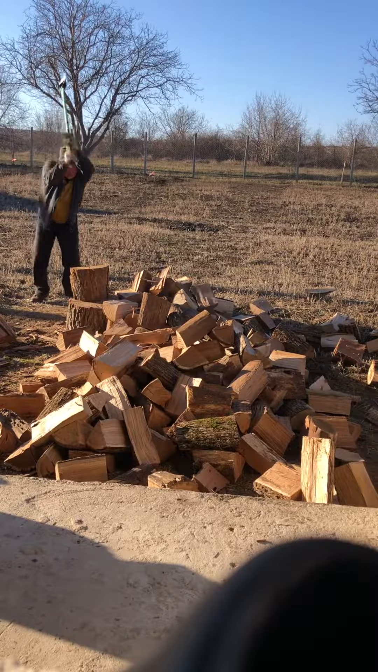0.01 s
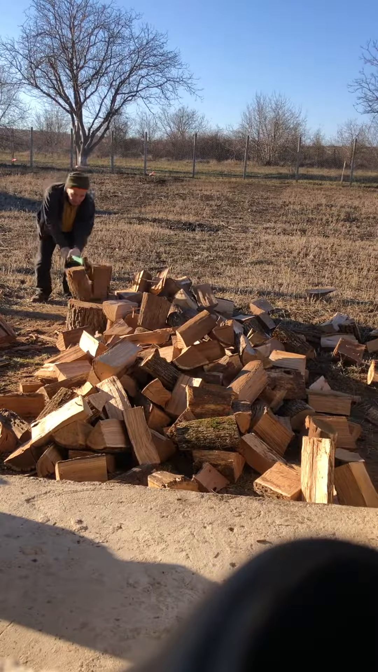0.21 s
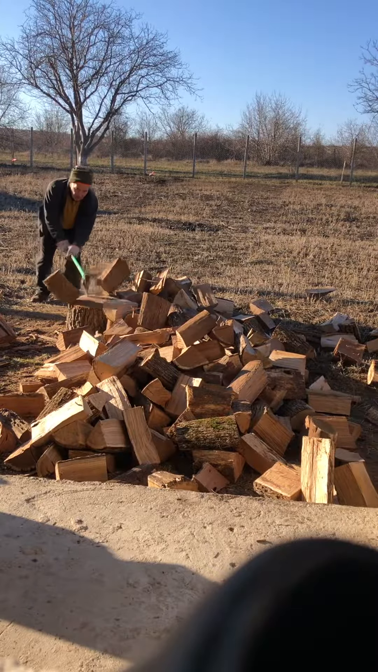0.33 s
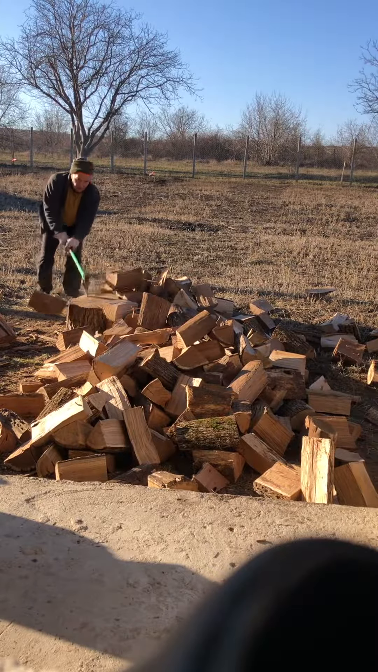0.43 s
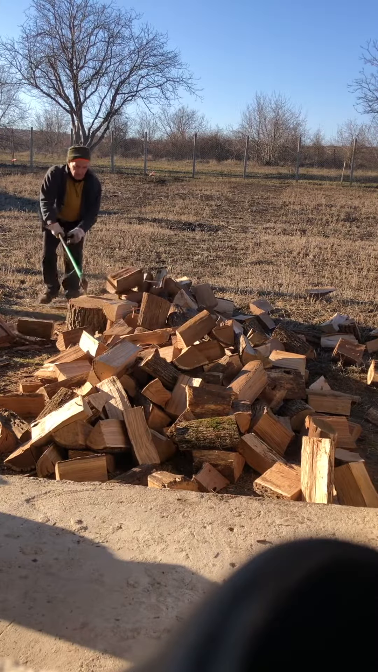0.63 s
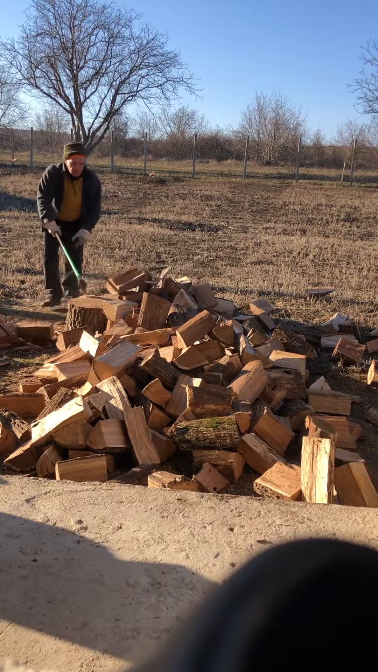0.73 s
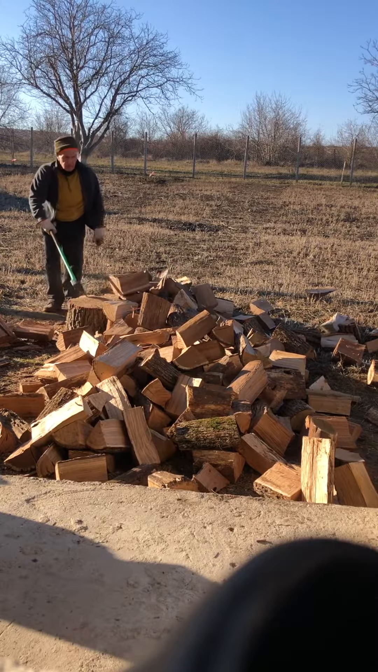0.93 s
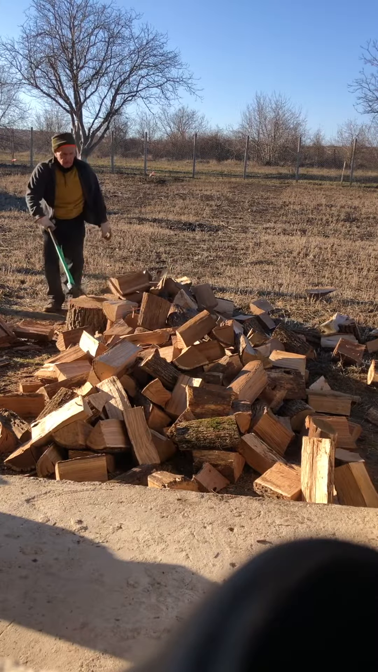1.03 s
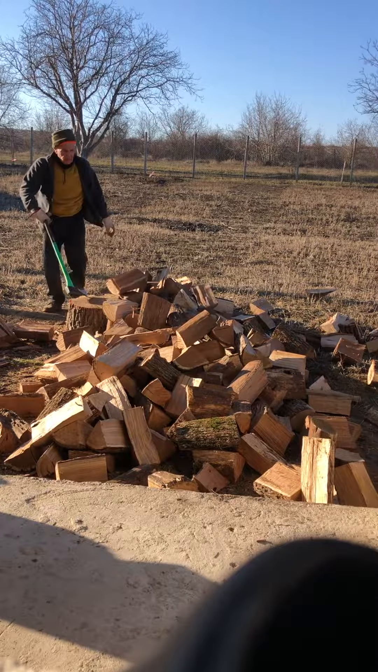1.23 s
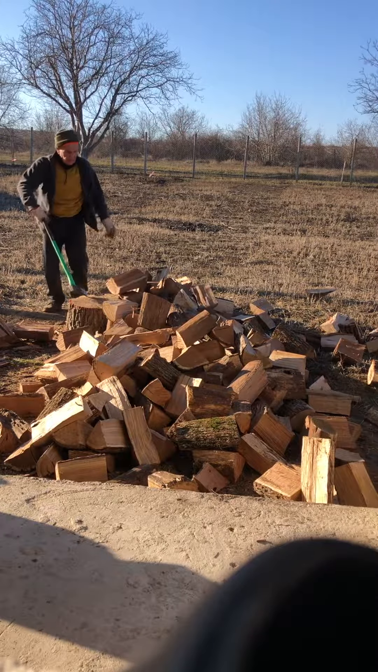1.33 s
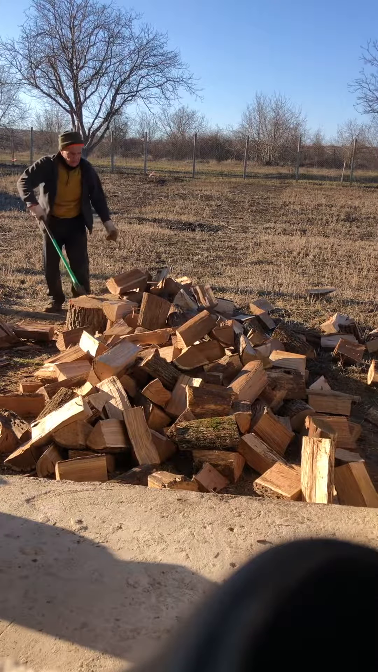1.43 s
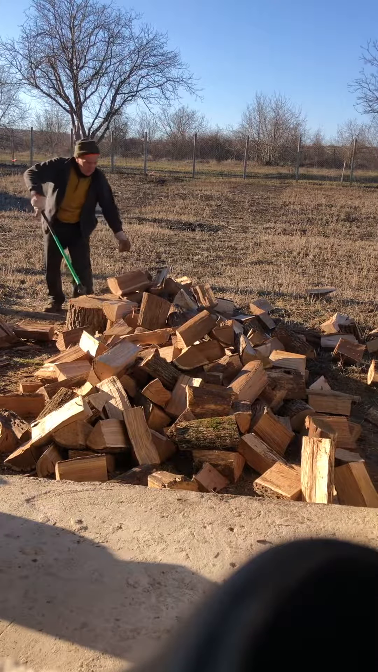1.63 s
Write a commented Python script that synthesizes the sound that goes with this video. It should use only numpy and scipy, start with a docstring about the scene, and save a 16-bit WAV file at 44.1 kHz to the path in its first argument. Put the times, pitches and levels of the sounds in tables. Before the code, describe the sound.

Wood splitting outdoors: a faint metallic tick, a sudden loud axe crack with ripping fibres and block thump, then snaps and wooden knocks fading quickly into soft air, light breeze and tiny chirps, with short scattered yard echoes.

```python
"""Axe splitting a log

An axe splits a log on a chopping block in a field, some metres from a yard: noise crack, ringing
log modes, grainy tearing and low sine thuds. The halves knock on the woodpile as click-driven modes;
splinters and bark are grainy bursts, a metal part ticks. Sparrows chirp as bending sines over
filtered-noise air, hum and breeze. Noise tails that die band by band give the echoes."""
import sys
import numpy as np
from scipy import signal
from scipy.io import wavfile

SR = 44100
rng = np.random.default_rng(int(sys.argv[2]) if len(sys.argv) > 2 else 0)


def transcribe(u):
    """Save the signal u as a 16-bit wav file named by the first command-line argument.

    u: samples, shape (n,) or (channels, n), limited to [-1, 1]; the rate is SR.
    q: integer samples, one column per channel.
    """
    v = np.clip(np.atleast_2d(u).T, -1, 1)
    q = np.round(v * 32767).astype(np.int16)
    wavfile.write(sys.argv[1], SR, q)


N = 74970

BLOW_S = .2236
# ring modes of the log: f/Hz, level when torn/dB, t60/s, level when struck/dB
LOG_MODES = [(333, -4.5, 0.022, -14), (472, 0, 0.029, -5), (575, 1, 0.036, -3.5), (740, -1, 0.026, -1.5),
             (889, -0.5, .035, 4), (1176, -2.5, 0.024, -3), (1410, 0, 0.012, -9), (1724, -1, 0.024, 0.5),
             (2000, -9.5, .012, -14), (3068, -14, 0.016, -4.5)]


def amp(db):
    """Amplitude ratio of a level in dB."""
    return 10 ** (np.asarray(db) / 20)


def unit(x):
    """Scale to RMS 1."""
    return x / np.sqrt(np.mean(x ** 2) + 1e-20)


def curve(rows):
    """Straight lines through (t/s, value) rows, per sample."""
    return np.interp(np.arange(N) / SR, *np.transpose(rows))


def at_hz(rows, hz, axis=1):
    """Table column at a frequency, interpolated over log frequency."""
    rows = np.array(rows)
    return np.interp(np.log(hz), np.log(rows[:, 0]), rows[:, axis])


def impulse(s):
    """Single unit click at s."""
    return np.arange(N) == int(s * SR)


def band(x, low_hz, high_hz):
    """Butterworth band-pass."""
    edges_hz = [low_hz, min(high_hz, .45 * SR)]
    return signal.sosfilt(signal.butter(2, edges_hz, "band", fs=SR, output="sos"), x + 1e-18)


def bands():
    """Half-octave bands from 40 Hz: low, high and centre in Hz."""
    edges_hz = 40 * 2 ** np.arange(0, 9.1, .5)
    return [(low, high, np.sqrt(low * high)) for low, high in zip(edges_hz, edges_hz[1:])]


def coloured(x, spectrum):
    """Half-octave bands at table gains, falling 24 dB/octave below the first row."""
    out = 0
    for k, (low_hz, high_hz, hz) in enumerate(bands()):
        octaves_below = max(0, np.log2(spectrum[0][0] / hz))
        gain = amp(at_hz(spectrum, hz) - 24 * octaves_below)
        out = out + (-1) ** k * gain * band(x, low_hz, high_hz)
    return out


def drift(rate_hz):
    """Slow random signal of RMS 1: noise through two equal low-pass poles."""
    r = np.exp(-2 * np.pi * rate_hz / SR)
    noise = rng.standard_normal(N + SR)
    return unit(signal.lfilter([1], [1, -2 * r, r * r], noise)[SR:])  # settled part


def dying(s, t60_s, rise_s=0.00044):
    """Envelope from s on: exponential rise (time constant rise_s) and decay."""
    t = np.maximum(np.arange(N) / SR - s, 0)
    return (1 - np.exp(-t / max(rise_s, 1e-5))) * amp(-60 * t / t60_s)


def ring(x, modes):
    """Two-pole resonators driven by x, one dying sine per mode, alternating in sign."""
    out = 0
    for k, (hz, db, t60_s) in enumerate(modes):
        r = amp(-60 / (t60_s * SR))
        w = 2 * np.pi * hz / SR
        mode = signal.lfilter([0, np.sin(w)], [1, -2 * r * np.cos(w), r * r], x + 1e-18)
        out = out + (-1) ** k * amp(db) * mode
    return out


def grains(per_s, uneven_db):
    """Random clicks of uneven size and either sign, RMS 1."""
    size = amp(uneven_db * np.minimum(rng.exponential(1, N), 4)) * rng.choice([-1, 1], N)
    return unit(size * (rng.random(N) < per_s / SR))


def burst(noise, envelope):
    """Noise under an envelope, scaled to the envelope's energy."""
    x = noise * envelope
    return x * np.sqrt(np.sum(envelope ** 2) / (np.sum(x ** 2) + 1e-30))


def air():
    """Filtered noise and faint ringing tones that swell together."""
    # air and far hum: f/Hz, level/dB per Hz
    air_spectrum = [(130, -3), (300, -8), (600, -4.5), (1100, -7.5), (1600, -14), (2500, -20), (5000, -23),
                    (10000, -30.5), (16000, -33)]
    # faint tones in the hum: f/Hz, level/dB, t60/s
    hum_tones = [(725.6, -2.5, 0.27), (1060, 6.5, .03)]
    # swell of air and hum: t/s, level/dB
    hum_swell = [(0, -4.5), (.6, 9.5), (.9, 0), (1.4, -2.5)]
    hiss = amp(-62.5) * unit(coloured(rng.standard_normal(N), air_spectrum))
    tones = amp(-71.5) * unit(ring(rng.standard_normal(N), hum_tones))
    return amp(curve(hum_swell)) * (hiss + tones)


def breeze():
    """Low noise band with a lumpy level."""
    # breeze before the lumps: t/s, level/dB
    wind = [(0, -54), (.13, -68.5), (.2, -55), (.5, -48), (.8, -57), (1.0, -81), (1.08, -65), (1.19, -64),
            (1.3, -53.5), (1.37, -66.5), (1.43, -56), (1.49, -58), (1.55, -65), (1.68, -59)]
    lumps_db = -2.5 * drift(21)
    return amp(curve(wind) + lumps_db) * unit(band(rng.standard_normal(N), 36.9, 110))


def sparrows():
    """Fluttering sines that rise, fall or bend; a parabola takes pitch through first, middle and last."""
    # notes: t/s, length/s, first f/Hz, middle f/Hz, last f/Hz, level/dB
    notes = [(.042, .018, 3700, 4500, 5200, -73), (.058, .036, 5200, 4800, 3500, -72),
             (.85, .03, 2450, 2900, 3500, -71), (.115, .04, 3000, 3500, 4100, -69),
             (.153, .037, 4000, 3100, 2600, -69), (.882, .016, 3400, 3000, 2750, -66),
             (.893, .03, 4700, 4300, 4200, -75), (.965, .03, 2700, 3100, 3600, -72),
             (1.02, .04, 2900, 3700, 3700, -74), (1.088, .034, 3000, 4100, 4700, -68),
             (1.116, .036, 4500, 3300, 3050, -68), (1.125, .045, 4300, 4500, 3900, -69),
             (1.16, .045, 2800, 3900, 2800, -68), (1.195, .055, 4200, 4200, 3300, -71),
             (1.27, .065, 3400, 4200, 3200, -73), (1.655, .03, 4500, 4600, 5300, -71),
             (1.675, .03, 2800, 4300, 4800, -68)]
    wobble_hz = 90 * np.resize(drift(180), N + SR)
    flutter_db = 2.5 * drift(69.66)
    out = np.zeros(N + SR)
    for s, length_s, first_hz, mid_hz, last_hz, db in notes:
        u = np.linspace(0, 1, int(length_s * SR))
        span = slice(int(s * SR), int(s * SR) + len(u))
        hz = first_hz * (1 - u) * (1 - 2 * u) + mid_hz * 4 * u * (1 - u) + last_hz * u * (2 * u - 1)
        envelope = np.sqrt(np.sin(np.pi * u).clip(0))
        turns = np.cumsum(hz + wobble_hz[span]) / SR
        out[span] += amp(db) * envelope * np.sin(2 * np.pi * turns)
    return out[:N] * amp(flutter_db)


def ticks():
    """A small metal part ticks on the swing: clicks into metal modes."""
    # ticks: t/s, level/dB
    tick_rows = [(0.143, -52.5)]
    # metal ring: f/Hz, level/dB, t60/s
    metal_modes = [(11000, 0, .05), (5600, -14, .03)]
    clicks = np.zeros(N)
    for s, db in tick_rows:
        clicks[int(s * SR)] = amp(db)
    return ring(clicks, metal_modes)


def snaps():
    """Splinters snap and bark scuffs: broad grainy bursts around a centre."""
    # snaps: t/s, level/dB, t60/s, centre f/Hz
    snap_rows = [(0.233, -30, 0.011, 9000), (0.2535, -21.5, 0.015, 9000), (0.2782, -20.5, 0.017, 6000),
                 (0.403, -52, 0.012, 9000), (0.429, -21, 0.015, 1890), (0.4311, -33, 0.0098, 6700),
                 (0.4575, -37, 0.017, 5500), (0.517, -55.5, 0.25, 9000), (0.552, -33, 0.084, 3430),
                 (.631, -61, 0.018, 5940), (.653, -44, 0.006, 3800), (0.698, -51, 0.066, 5400),
                 (0.712, -57, 0.033, 7600), (0.7638, -43, 0.037, 2310), (0.812, -53.5, 0.1, 3630),
                 (0.895, -54, 0.015, 4250), (0.936, -53, 0.0085, 3570), (1.529, -59.5, 0.12, 2970)]
    spread = 2.3  # band edge to centre ratio
    noise = grains(10000, 2.7)
    out = 0
    for s, db, t60_s, hz in snap_rows:
        envelope = dying(s, t60_s, rise_s=.06 * t60_s)
        out = out + amp(db) * burst(band(noise, hz / spread, hz * spread), envelope)
    return out


def knocks():
    """Halves and a chip knock on the pile: click and rattle ring modes, favouring those near one pitch."""
    # knocks: t/s, level/dB, pitch ratio to a half, favoured f/Hz
    knock_rows = [(.5555, -26.5, 1.09, 2200), (.558, -21.5, 1.007, 530), (.5665, -25, 1.01, 530),
                  (.577, -30.5, 1.04, 610), (.61, -40.5, 1.05, 750), (.7645, -38, 1, 860),
                  (.773, -47.5, 1.03, 600), (.794, -46, 0.93, 800), (1.546, -59, 2.83, 1910)]
    # ring of a loose half: f/Hz, level/dB, t60/s
    half_modes = [(366, -9, .05), (565, 0, .07), (743, -9, .04), (1050, -4, .03), (1560, -10, .025),
                  (2040, -8, .02), (2800, -10, .015)]
    rattle_t60_s, favour_db = 0.0089, 8  # mode loss = favour_db * octaves from favoured pitch squared
    rattle = amp(-22) * grains(3100, 0.86)
    out = 0
    for s, db, pitch, favoured_hz in knock_rows:
        modes = []
        for hz, mode_db, t60_s in half_modes:
            octaves = np.log2(hz * pitch / favoured_hz)
            modes.append((hz * pitch, mode_db - favour_db * octaves ** 2, t60_s))
        contact = impulse(s) + rattle * dying(s, rattle_t60_s)
        out = out + ring(amp(db) * contact, modes)
    return out


def thuds():
    """Block, ground and boots: sines that swell, glide in pitch and die."""
    # thuds: t/s, level/dB, first f/Hz, last f/Hz, t60/s
    thud_rows = [(0.223, -20.5, 234, 122.8, 0.32), (.236, -18.5, 110, 59.5, 0.13),
                 (0.274, -25, 150, 152, 0.068), (0.306, -22.5, 204.5, 59.5, 0.18),
                 (0.456, -35.5, 250, 228, 0.086), (0.488, -30.5, 155, 142, 0.061),
                 (0.559, -31, 312, 127, 0.11), (.574, -26, 110, 74, 0.11), (.635, -27.5, 253, 236, 0.049),
                 (0.699, -44, 80, 55.4, 0.43), (0.794, -52, 281, 282, 0.074),
                 (0.883, -47.5, 158, 142.5, 0.15), (1.087, -46.5, 263, 71.7, 0.16)]
    glide_s = .015  # time constant
    out = 0
    for s, db, first_hz, last_hz, t60_s in thud_rows:
        t = np.maximum(np.arange(N) / SR - s, 0)
        turns = last_hz * t - (first_hz - last_hz) * glide_s * np.expm1(-t / glide_s)
        envelope = dying(s, t60_s, rise_s=.5 / first_hz)  # half a cycle
        out = out + amp(db) * envelope * np.sin(2 * np.pi * turns)
    return out


def tearing():
    """Fibres tear as the log opens: grains into the log's ring, plus their hiss."""
    # opening: t/s, level/dB
    tear = [(.225, -27.5), (.235, -18.5), (.243, -15), (.254, -22), (.275, -23.5), (.29, -24.5),
            (.305, -22.5), (.32, -35), (.345, -39), (.38, -51), (.42, -45)]
    # hiss: f/Hz, level/dB per Hz
    tear_hiss = [(1500, 2.5), (4000, -3), (8000, -8), (16000, -24.5)]
    after_s = np.maximum(np.arange(N) / SR - tear[-1][0], 0)
    opening = amp(curve(tear) - 300 * after_s) * dying(BLOW_S, 99)  # 300 dB/s after the last row
    fibres = grains(6000, 1)
    torn_modes = [(hz, db, t60_s) for hz, db, t60_s, _ in LOG_MODES]
    body = ring(burst(fibres, opening), torn_modes) / ring(fibres, torn_modes).std()
    hiss = amp(-19) * burst(coloured(fibres, tear_hiss), dying(BLOW_S, 0.24))
    return body + hiss


def strike():
    """The edge strikes the log: one click into its ring."""
    struck_modes = [(hz, db, t60_s) for hz, _, t60_s, db in LOG_MODES]
    return ring(amp(-11) * impulse(BLOW_S), struck_modes)


def crack():
    """The edge bites: coloured noise, held briefly, then dying fast."""
    # crack: f/Hz, level/dB per Hz
    crack_spectrum = [(300, -13.5), (1000, -5.5), (2000, -7), (3500, -9), (6000, -2.5), (10000, -11),
                      (16000, -18)]
    bite_s, t60_s = .0015, .007
    after_s = np.maximum(np.arange(N) / SR - BLOW_S - bite_s, 0)
    bite = dying(BLOW_S, 99) * amp(-60 * after_s / t60_s)
    return amp(-13) * burst(coloured(rng.standard_normal(N), crack_spectrum), bite)


def yard(x):
    """Scattered echoes off yard and walls: convolution with noise that dies band by band."""
    # echoes: f/Hz, t60/s, level/dB (relative)
    echo_rows = [(102, 0.48, -13.5), (278, .5, 0.5), (662.7, 0.15, -14), (1600, 0.41, -5.5),
                 (4460, 0.65, -15), (11900, 0.14, -21.5)]
    t = np.arange(SR) / SR
    white = rng.standard_normal((2, SR))
    tail = 0
    for k, (low_hz, high_hz, hz) in enumerate(bands()):
        level_db = at_hz(echo_rows, hz, axis=2) - 30 - 60 * t / at_hz(echo_rows, hz)
        tail = tail + amp(level_db) * band(white[k % 2], low_hz, high_hz)  # neighbours differ in noise
    return signal.fftconvolve(x, tail * (1 - np.exp(-t / 0.0024)))[:N]


def scene():
    """Mix of all layers; ticks, air and breeze have no echo."""
    thud = thuds()
    near = sparrows() + snaps() + knocks() + tearing() + strike() + crack()
    echoes = yard(near + amp(-8) * thud)  # thuds travel through the ground and echo less
    return (air() + breeze() + ticks() + near + thud + echoes)[None]


def record(dry):
    """Steep low-pass at the top of the band."""
    return signal.sosfilt(signal.cheby2(20, 100, 16900, fs=SR, output="sos"), dry)


dry = scene()
out = record(dry)
transcribe(out)
```